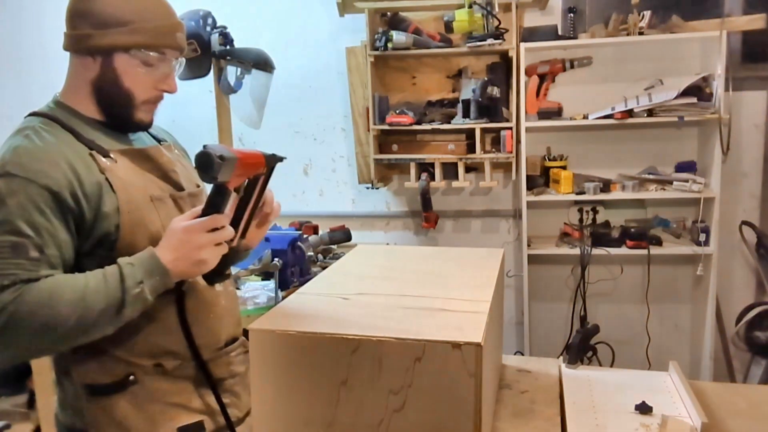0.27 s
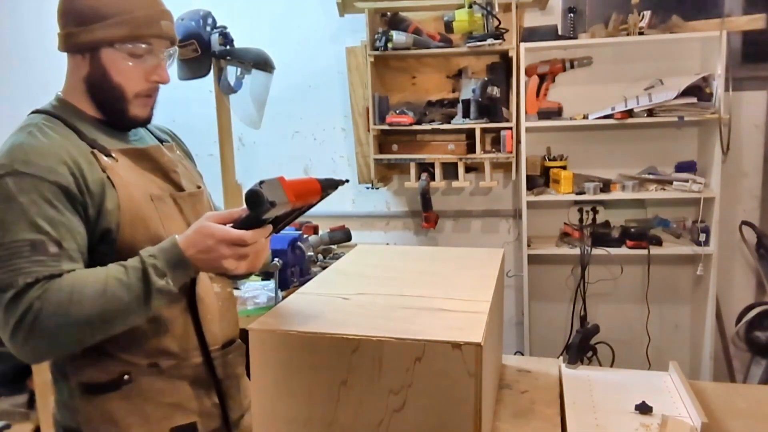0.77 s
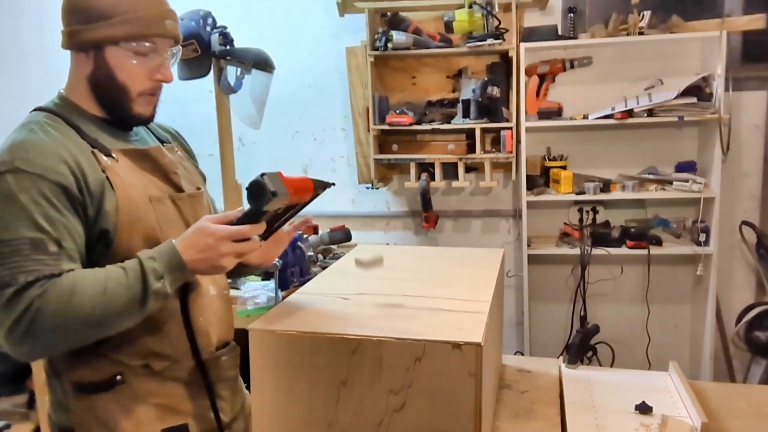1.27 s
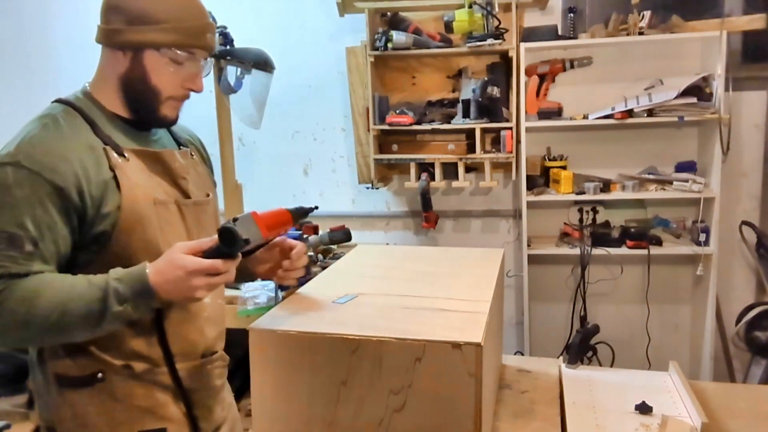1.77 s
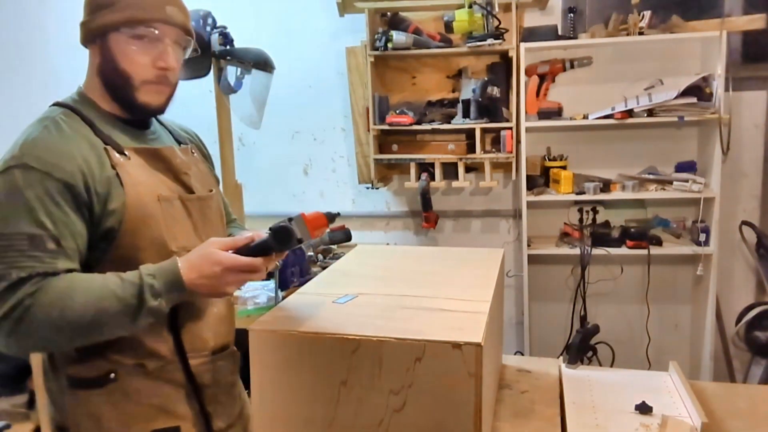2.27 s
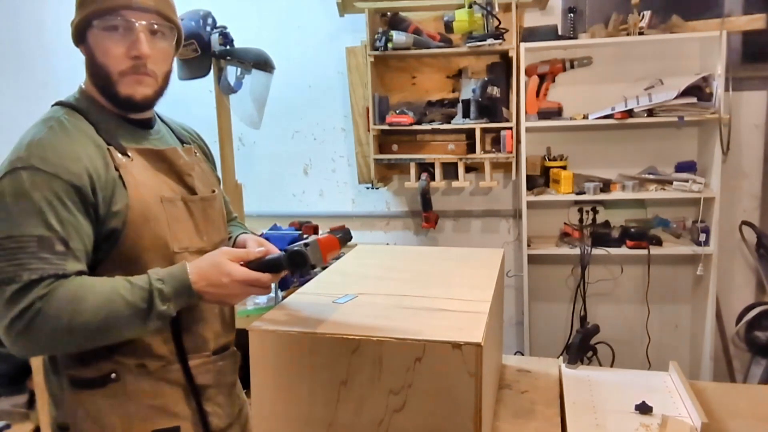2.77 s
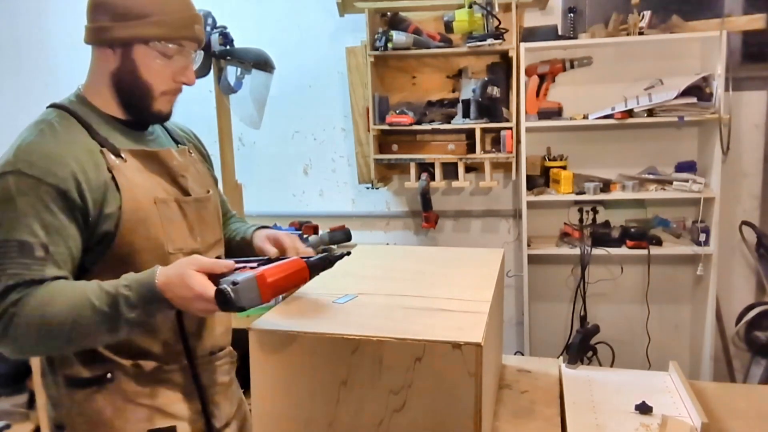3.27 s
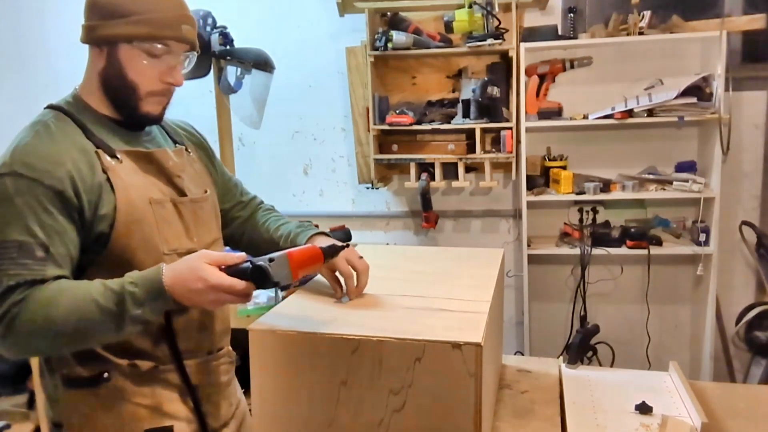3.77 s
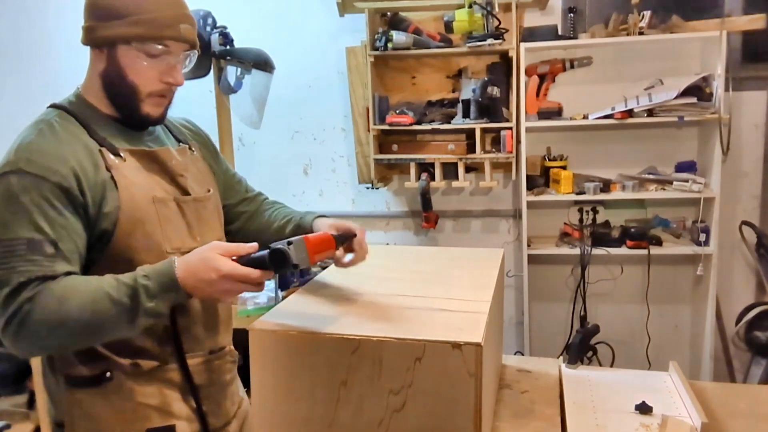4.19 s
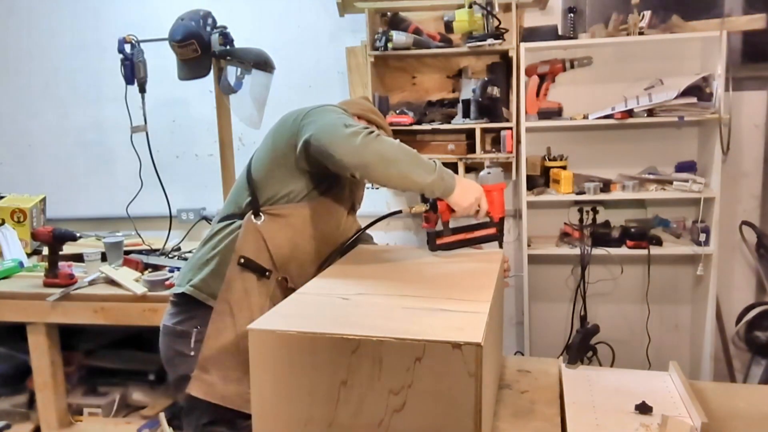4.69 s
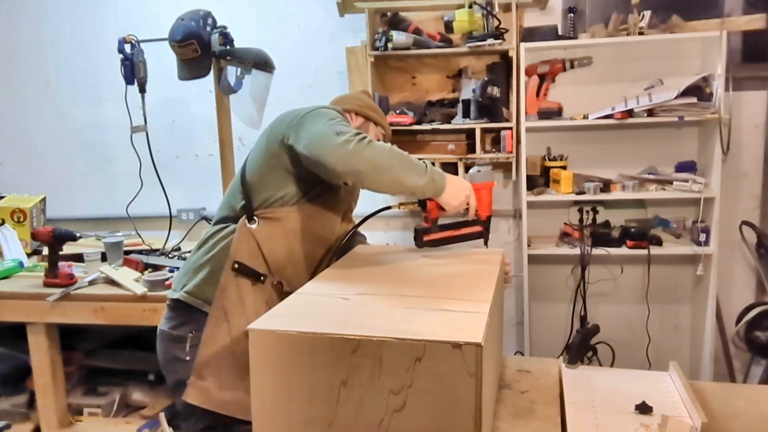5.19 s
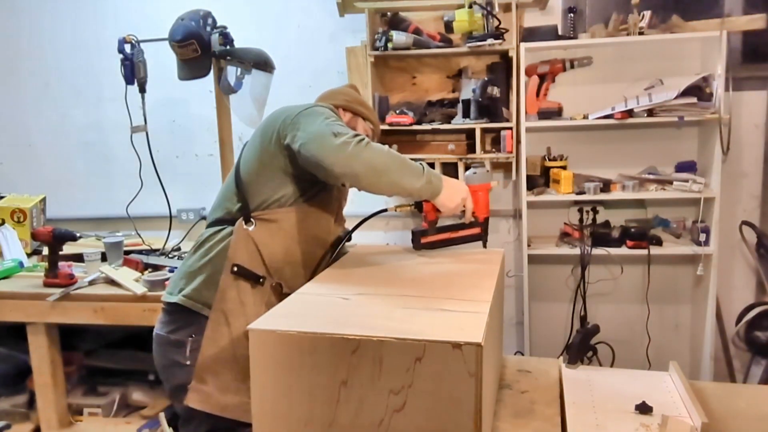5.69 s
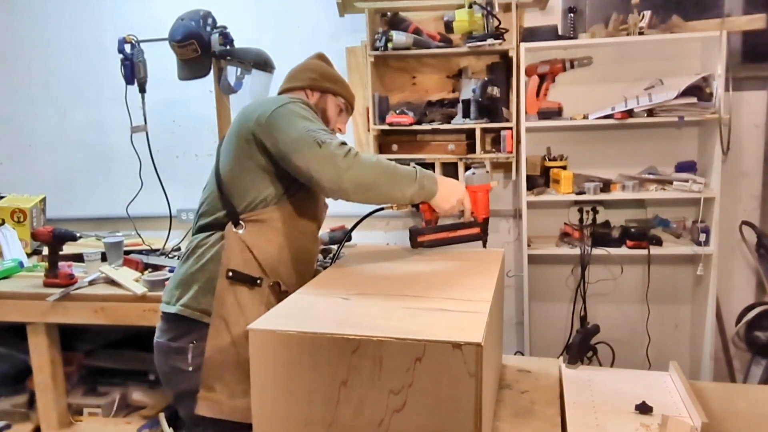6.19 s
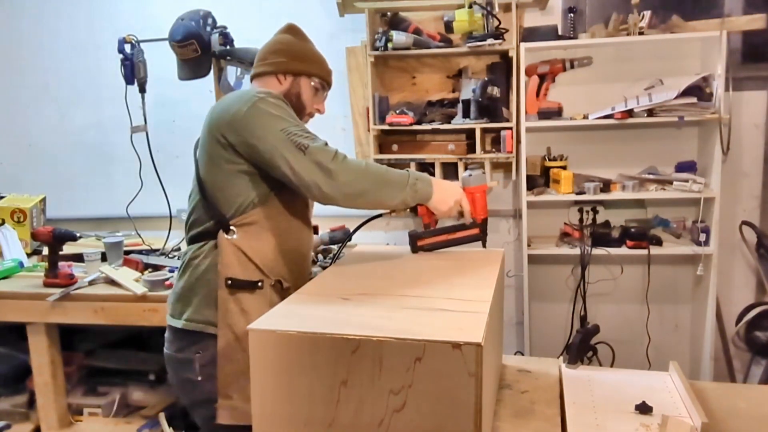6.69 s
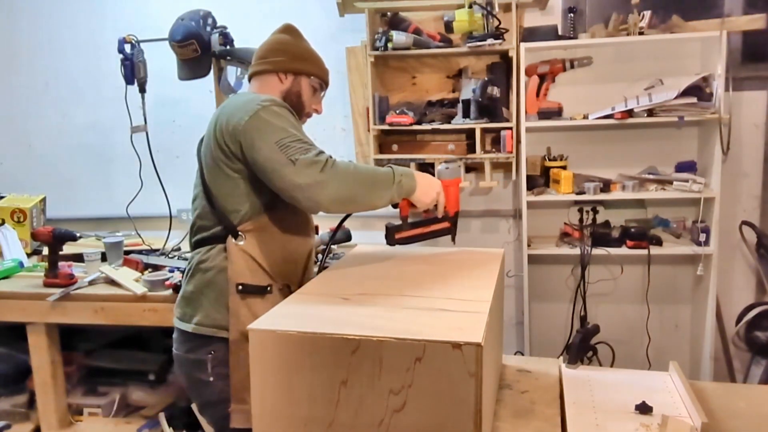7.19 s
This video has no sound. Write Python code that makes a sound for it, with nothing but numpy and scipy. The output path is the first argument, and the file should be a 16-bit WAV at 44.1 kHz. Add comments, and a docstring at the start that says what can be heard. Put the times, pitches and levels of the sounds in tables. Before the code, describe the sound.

A pneumatic nail gun is reloaded with metallic clatter, then fires two sharp shots into a wooden box, each with a hiss.

```python
"""A hard-walled garage: a pneumatic nailer is reloaded and fired twice into a plywood box.
The magazine clatters open, a strip of nails drops on the box, cloth rustles and the follower scrapes home.
Each shot is a valve puff, the driver's blow, a recoil thud through the box and a jet of exhaust air.
A limiter holds the blast and its echo at one level; a faint room rumble lies underneath."""
import sys
import numpy as np
from scipy import signal
from scipy.fft import rfft, irfft, next_fast_len
from scipy.io import wavfile
from scipy.ndimage import uniform_filter1d

SR = 44100
rng = np.random.default_rng(int(sys.argv[2]) if len(sys.argv) > 2 else 0)


def pcm_store(signal):
    """Save signal as 16-bit PCM."""
    levels = np.round(np.clip(np.atleast_2d(signal), -1, 1) * 32767)
    wavfile.write(sys.argv[1], SR, levels.astype(np.int16).T)


N = 328545
TIME = np.arange(N) / SR
RING_TIME = TIME[:2 ** 15]

# the two shots: (safety tip pressed [s], valve opens [s], driver strikes [s], exhaust starts [s],
# tip level [dB], valve level [dB], blow level [dB], exhaust level [dB])
SHOTS = [(4.451, 4.473, 4.497, 4.651, -44, -21.5, 1, -2), (6.46, 6.494, 6.517, 6.610, -55, -23, -4.5, -1.5)]
# bright spectrum of air jets and tinkling nails: (frequency [Hz], level [dB])
HISS = [(300, -29.5), (1000, -11.5), (2500, -10), (6500, -7.5), (8000, -10.5), (10000, -7), (12500, -2.5),
        (15500, -3)]


def from_db(db):
    """Decibels to amplitude."""
    return 10 ** (np.asarray(db) / 20)


def unit(x):
    """Scale to an energy of one."""
    return x / np.sqrt(np.sum(x ** 2, axis=-1, keepdims=True) + 1e-20)


def at_hz(points, hz):
    """Read a table on a log-frequency axis."""
    f, value = np.transpose(points)
    return np.interp(np.log(np.maximum(hz, 1)), np.log(f), value)


def colour(x, spectrum):
    """Minimum-phase EQ through (frequency [Hz], gain [dB]) points."""
    size = next_fast_len(x.shape[-1] // 2 + 2048, True) * 2
    gain = from_db(at_hz(spectrum, np.fft.rfftfreq(size, 1 / SR)))
    cepstrum = irfft(np.log(gain))
    cepstrum[1:size // 2] *= 2
    cepstrum[size // 2 + 1:] = 0
    return irfft(rfft(x, size) * np.exp(rfft(cepstrum)))[..., :x.shape[-1]]


def noise(spectrum):
    """Coloured noise of rms one."""
    return unit(colour(rng.standard_normal(N), spectrum)) * np.sqrt(N)


def grain(rough_db, per_s):
    """A gain that flutters at random."""
    knots = np.arange(0, 8, 1 / per_s)
    return from_db(rough_db * np.interp(TIME, knots, rng.standard_normal(len(knots))))


def diffuse(size):
    """Stereo noise from all sides: near mono in the bass, wide above it."""
    # (frequency [Hz], left-right correlation [-1..1])
    likeness = [(60, 0.97), (190, 0.96), (300, .87), (640, 0.24), (1400, -.05), (3100, .08), (7000, -0.02),
                (15000, 0.49)]
    mid, side = np.exp(2j * np.pi * rng.random((2, size // 2 + 1)))
    alike = at_hz(likeness, np.fft.rfftfreq(size, 1 / SR))
    return unit(irfft(np.sqrt(1 + alike) * mid + np.sqrt(1 - alike) * side * [[1], [-1]], size))


def add(out, s, sound, level_db):
    """Place a hit; its level is its energy spread over a twentieth of a second."""
    start = int(s * SR)
    out[start:start + len(sound)] += (from_db(level_db) * np.sqrt(SR / 20) * unit(sound))[:N - start]


def ringing(modes, detune=0.006):
    """Decaying sines; grip and contact point shift their pitch and strength a little each time."""
    hz, db, t60 = np.transpose(modes)[:, :, None]
    hz = hz * (1 + detune * rng.standard_normal(hz.shape))
    strength = from_db(db + rng.normal(0, 1.5, db.shape)) * rng.choice([-1, 1], db.shape)
    decay = np.exp(-np.log(1000) * RING_TIME / t60)
    return unit(np.sum(strength * decay * np.sin(2 * np.pi * hz * RING_TIME), axis=0))


def strike(spectrum, modes, ring_db, chatter_s):
    """A brief chatter of the parts, coloured by the body, plus its ringing modes."""
    chatter = rng.standard_normal(len(RING_TIME)) * np.exp(-RING_TIME / chatter_s)
    whitened = irfft(np.exp(1j * np.angle(rfft(chatter))))
    force = whitened * (RING_TIME < 10 * chatter_s)
    return unit(colour(force, spectrum)) + from_db(ring_db) * ringing(modes)


def room_rumble(level_db=-65):
    """Faint, steady room tone from all around."""
    # (frequency [Hz], level [dB])
    room_tone = [(18, -36), (30, -7), (75, 2.5), (410, -9.5), (575, -2.5), (1020, -14), (1230, -7.5),
                 (2550, -11), (5310, -19), (6370, -19), (8060, -24.5), (11900, -27), (15500, -31)]
    return from_db(level_db) * np.sqrt(N) * unit(colour(diffuse(N), room_tone))


def soft_rustles():
    """A brief, soft hiss fades at the very start; later, cloth rustles and low shuffles swell and fade."""
    # (middle [s], half length [s], rustle [dB], low shuffle [dB])
    cues = [(0.0, 0.041, -53.5, -61), (1.935, 0.17, -76, -64), (3.76, 0.18, -61, -63),
            (3.997, .045, -49, -68.5), (4.217, 0.036, -65, -61.5), (4.392, 0.073, -72.5, -61.5),
            (5.736, .14, -60, -50.5), (6.39, .05, -63.5, -60.5), (7.42, 0.15, -66, -59.5)]
    # papery mids and soft lows: (frequency [Hz], level [dB])
    rustle_spectrum = [(150, -11.5), (380, -8.5), (580, 3.5), (1000, -1), (2500, -4.5), (4500, -16.5),
                       (8000, -24.5), (15000, -28)]
    shuffle_spectrum = [(40, -17.5), (75, -1), (120, -9.5), (190, -0.5), (300, -12.5), (600, -16),
                        (2000, -48)]
    middle_s, half_s, rustle_db, shuffle_db = np.transpose(cues)
    swells = np.exp(-((TIME - middle_s[:, None]) / half_s[:, None]) ** 2)
    rustle = from_db(rustle_db) @ swells * noise(rustle_spectrum)
    shuffle = from_db(shuffle_db) @ swells * noise(shuffle_spectrum)
    return (rustle + shuffle) * grain(rough_db=1.5, per_s=120)


def gun_contact(hollow_db, body_db, edge_db, attack_s=0.0018):
    """One clack with a slightly softened attack: blunt ones sound hollow, steel on steel has an edge."""
    # the gun's body: (frequency [Hz], level [dB])
    spectrum = [(100, -43.5), (250, -24), (500, -7.5), (900, -3), (1900, 3), (3200, -0.5), (4000, -1),
                (6000, -3.5), (8000, -12), (10000, -11), (15500, -12)]
    # its ring: (frequency [Hz], level [dB], t60 [s])
    modes = [(917, 5, 0.039), (1217, -6.5, .16), (1443, -3.5, 0.11), (1847, 4, 0.1), (2534, 2, 0.081),
             (3250, -0.5, 0.038), (4100, -5, 0.075), (4880, -5, 0.046), (5270, -6.5, 0.02),
             (6020, 0.5, 0.074), (7360, -10.5, .1), (10060, -9, 0.05), (11530, -9.5, .07)]
    hit = strike(spectrum, modes, ring_db=-10, chatter_s=0.0055)
    fade_in = 1 - np.exp(-RING_TIME / attack_s)
    tone = [(110, -26), (350, hollow_db - 0.5), (900, hollow_db),   # small parts radiate no bass
            (1500, body_db), (2500, 0), (9000, edge_db)]
    return colour(hit * fade_in, tone)


def gun_taps():
    """Hand and hose bump the gun with blunt, hollow taps."""
    # (time [s], level [dB], edge [dB])
    taps = [(0.227, -51.5, -7.5), (2.184, -55, -27), (2.220, -50, -19.5), (2.236, -52, -15),
            (2.376, -51.5, -15), (2.562, -41.5, -13), (2.723, -50, -16), (5.780, -52.5, -18),
            (7.284, -52.5, -17), (7.303, -47, -8)]
    out = np.zeros(N)
    for s, db, edge_db in taps:
        add(out, s, gun_contact(hollow_db=8.5, body_db=4, edge_db=edge_db), db)
    return out


def steel_snaps():
    """Steel parts snap against a stop and the magazine rail rings."""
    # (time [s], level [dB], edge [dB], rail ring [dB])
    snaps = [(0.251, -32.5, 7.5, -35.5), (.282, -39.5, 0, -46), (.446, -49.5, 1, -53),
             (2.254, -43, -3, -56), (2.901, -42, -2, -56.5), (2.973, -18, 5, -39), (5.185, -53, -4, -68),
             (5.323, -52.5, -1.5, -66), (5.384, -57.5, 6, -70)]
    # (frequency [Hz], level [dB], t60 [s])
    rail_modes = [(1150, -10.5, 0.1), (1280, -7.5, .3), (1400, -6, 0.2), (1462, -7, 0.32),
                  (2580, -3.5, .16), (2700, -2, 0.11), (3300, -6, .2), (4140, -5.5, 0.16), (4380, -4, 0.32),
                  (4830, -8, .16), (5870, -1.5, .14), (6230, -1.5, .14), (7160, -12, .25),
                  (10200, -12.5, .2)]
    out = np.zeros(N)
    for s, db, edge_db, rail_db in snaps:
        thin_db = 0.9 * edge_db   # the sharper the edge, the thinner the mids
        add(out, s, gun_contact(hollow_db=-3 - thin_db, body_db=-5 - thin_db, edge_db=edge_db), db)
        rail = ringing(rail_modes, detune=0.0035)
        add(out, s, colour(rail, [(300, -30.5), (1100, 1.5)]), rail_db)
    return out


def follower_slides(width_hz=260, loosen_s=0.036, push_s=0.1, swell_db=20.5):
    """The follower scrapes along the magazine; two resonances climb as the free channel shortens."""
    # (start [s], end [s], level [dB], first resonance at start [Hz], at end [Hz])
    slides = [(0.777, .888, -40, 1397, 1900), (2.72, 2.973, -39.5, 720, 2854)]
    # gritty friction: (frequency [Hz], level [dB])
    friction = [(300, -30), (470, -19.5), (580, 0), (750, -12), (1400, -2), (2700, 3), (6000, -5.5),
                (8000, -17.5), (15500, -17)]
    scrape, out = noise(friction), np.zeros(N)
    band = [(width_hz / 2, 0), (width_hz * 10, -60)]
    lower, upper = [noise(band) * np.sqrt(2) for _ in range(2)]
    for start_s, end_s, db, start_hz, end_hz in slides:
        hz = np.exp(np.interp(TIME, [start_s, end_s], np.log([start_hz, end_hz])))
        phase = 2 * np.pi * np.cumsum(hz) / SR
        channel = lower * np.sin(phase) + from_db(-4) * upper * np.sin(1.57 * phase)
        push_db = np.interp(TIME - start_s, [0, push_s], [-swell_db, 0])   # it gathers speed
        moving = np.clip((TIME - start_s) / loosen_s, 0, 1) * (TIME < end_s)
        howl = 0.7 * from_db(0.7 * push_db) * channel   # swells less than the grit
        out += from_db(db) * moving * (from_db(push_db) * scrape + howl)
    return out * grain(rough_db=1.5, per_s=250)


def magazine_clatter(opening_db_per_s=70, rebound_s=0.006, rebound_loss_db=4):
    """The magazine clatters open, ever hollower as the air in its channel rings more."""
    # (time [s], level [dB])
    contacts = [(0.884, -32), (0.892, -18.5), (.924, -21.5), (.944, -18), (.970, -17.5), (1.001, -19.5)]
    out = np.zeros(N)
    for s, db in contacts:
        open_db = opening_db_per_s * (s - contacts[0][0])
        channel = ringing([(910, 0, 0.04)], detune=0.06)
        add(out, s, colour(channel, [(100, -45), (800, 0)]), db - 17 + open_db)
        for k in range(2):   # each contact rebounds once
            hit = gun_contact(hollow_db=open_db - 5, body_db=open_db - 2.5, edge_db=1.5)
            add(out, s + k * rebound_s, hit, db - k * rebound_loss_db)
    return out


def box_contact(boom_db, knock_db, ring_db):
    """Heavy, soft contacts make the box boom; light, hard ones knock."""
    # the plywood's body: (frequency [Hz], level [dB])
    spectrum = [(35, -45), (65, -10.5), (110, -12.5), (180, 4.5), (280, -1.5), (420, -2.5), (650, -1),
                (1100, -4.5), (2700, -9), (4000, -24), (6500, -29.5), (15000, -62.5)]
    # its ring: (frequency [Hz], level [dB], t60 [s])
    modes = [(145.4, -0.5, 0.097), (165, 2.5, .1), (207, 2.5, 0.11), (290.5, -5.5, .15), (416, -3.5, .15),
             (570, 0.5, 0.31), (724, -3, 0.2), (1390, -11, 0.093), (2514, -8, .15)]
    hit = strike(spectrum, modes, ring_db, chatter_s=0.01)
    tone = [(28, -20.5), (62, boom_db), (80, boom_db), (140, 1.5), (200, -1), (450, knock_db)]
    return colour(hit, tone)


def box_knocks(colour_share=0.38, rock_shrink=0.58):
    """The box is knocked and rocks twice, with dull thuds that keep some of the blow's colour."""
    # (time [s], level [dB], boom [dB], knock [dB], first rock after [s], rock relative to blow [dB])
    knocks = [(1.249, -13, -26, 3.5, 0.081, -5.5), (3.497, -51, -7, -17.5, 0.029, -9.5),
              (5.326, -33, 11, -16, .047, -7), (6.019, -55.5, -1, -13.5, .04, -11.5),
              (7.305, -50, 7, -10, .05, -11)]
    out = np.zeros(N)
    for s, db, boom_db, knock_db, rock_s, rock_db in knocks:
        add(out, s, box_contact(boom_db, knock_db, ring_db=-3.5), db)
        for k in range(2):   # the second rock comes sooner and 1 dB weaker
            s += rock_s * rock_shrink ** k
            thud = box_contact(13 + colour_share * boom_db, -11.5 + colour_share * knock_db, ring_db=-6)
            add(out, s, thud, db + rock_db - k)
    return out


def nail_strip():
    """The strip of nails tinkles as it lands and bounces."""
    # (time [s], level [dB])
    bounces = [(1.249, -40), (1.256, -46.5), (1.38, -42.5), (1.434, -51)]
    # the strip's ring: (frequency [Hz], level [dB], t60 [s])
    modes = [(7461, 0, .07), (7560, -2, .05), (8533, -9, .06), (10200, -19, .05)]
    out = np.zeros(N)
    for s, db in bounces:
        add(out, s, strike(HISS, modes, ring_db=8, chatter_s=0.0034), db)
    return out


def safety_tip():
    """A bright click as the tip is pressed on before each shot."""
    out = np.zeros(N)
    for s, _, _, _, db, _, _, _ in SHOTS:
        add(out, s, gun_contact(hollow_db=-3.5, body_db=4, edge_db=8), db)
    return out


def shot_thuds():
    """The box thuds as the tip presses on, the gun recoils and lands, and the piston returns."""
    # each thud: (delay [s], level [dB], boom [dB], knock [dB])
    press = (.013, -47.5, 3.5, -10)
    recoil = (.012, -12, -5.5, -12.5)
    landing = (.046, -16, 5, 0.5)
    piston_return = (.034, -19, 14, -13)
    out = np.zeros(N)
    for tip_s, _, blow_s, exhaust_s, _, _, blow_db, _ in SHOTS:
        cues = [(tip_s, press), (blow_s, recoil), (blow_s, landing), (exhaust_s, piston_return)]
        for s, (delay_s, db, boom_db, knock_db) in cues:
            thud = box_contact(boom_db, knock_db, ring_db=-4.5)
            add(out, s + delay_s, thud, db + 0.31 * blow_db)   # a harder blow thuds louder
    return out


def jet(start_s, rise_s, fall_s):
    """Air flow through a valve that opens and drains a chamber."""
    age = np.maximum(TIME - start_s, 0)
    return (1 - np.exp(-age / rise_s)) * np.exp(-(age / fall_s) ** 2)


def air_jets():
    """The trigger valve puffs before the blow; on release the cylinder vents, then a faint hiss lingers."""
    flow = np.zeros(N)
    for _, valve_s, _, exhaust_s, _, valve_db, _, exhaust_db in SHOTS:
        flow += from_db(valve_db) * jet(valve_s, rise_s=0.0015, fall_s=0.095)
        flow += from_db(exhaust_db) * jet(exhaust_s, rise_s=0.0015, fall_s=0.022)
        flow += from_db(-61.5) * jet(exhaust_s, rise_s=0.05, fall_s=0.42)
    return flow * noise(HISS)


def driver_blows():
    """The piston slams the nail home; gun and plywood ring together."""
    # the slam: (frequency [Hz], level [dB])
    spectrum = [(35, -40), (70, -11.5), (190, -7.5), (380, -6.5), (560, -7), (780, -1.5), (1150, -5),
                (1800, 3), (2700, 0), (3700, -4), (6200, -9), (8000, -17.5), (15500, -12)]
    # its ring: (frequency [Hz], level [dB], t60 [s])
    modes = [(171, -3, .12), (196.8, -1, 0.05), (526, -4, 0.092), (558, -5, 0.18), (726, -5.5, .06),
             (794, -7, .08), (1405, -10.5, .06), (1636, 1, .06), (1878, 2, .06), (1965, -3.5, .05),
             (2210, -1, 0.052), (2484, 0, 0.037), (2704, 3, 0.041), (2955, 0, 0.029), (3300, -0.5, .035),
             (4270, -2, 0.03), (6300, -8.5, .04)]
    out = np.zeros(N)
    for _, _, s, _, _, _, db, _ in SHOTS:
        blow = strike(spectrum, modes, ring_db=-3, chatter_s=0.023)
        crack = colour(blow, [(500, -13), (1600, 0)])
        panel = 1 - np.exp(-RING_TIME / 0.007)   # the steel cracks first, the heavy panel follows
        add(out, s, panel * blow + (1 - panel) * crack, db)
    return out


def garage_echo(build_s=0.0014):
    """Dense reflections that build up quickly and die away band by band."""
    # (frequency [Hz], t60 [s])
    decay_times = [(60, 0.53), (170, 0.46), (420, 0.64), (1100, 0.76), (2900, 0.67), (5000, 0.63),
                   (7700, 0.45), (15000, 0.27)]
    size = len(RING_TIME)
    field, hz = rfft(diffuse(size)), np.fft.rfftfreq(size, 1 / SR)
    centres, t60s = np.transpose(decay_times)
    echo = 0
    for share, t60 in zip(np.eye(len(centres)), t60s):
        band = irfft(field * at_hz(np.c_[centres, share], hz))
        echo += band * np.exp(-np.log(1000) * RING_TIME / t60) / np.sqrt(t60)
    echo *= grain(rough_db=2, per_s=300)[:size]   # reflections arrive in clumps
    return unit(echo * (1 - np.exp(-(RING_TIME / build_s) ** 2)))


def in_garage(x, direct_db, left_db, lag_s):
    """Direct sound plus echo; the left side is louder by left_db, its direct sound later by lag_s."""
    direct = np.array([np.interp(TIME - lag_s, TIME, x, left=0), x])
    echo = signal.oaconvolve(x[None], garage_echo(), axes=1)[:, :N]
    return (from_db(direct_db) * direct + echo) * from_db([[left_db / 2], [-left_db / 2]])


def scene():
    """Handling near the middle, shots to the right, over a faint room rumble."""
    clacks = gun_taps() + steel_snaps() + magazine_clatter() + safety_tip()
    handling = in_garage(soft_rustles() + clacks + follower_slides(), direct_db=-5.5, left_db=1, lag_s=0)
    box = in_garage(box_knocks() + nail_strip() + shot_thuds(), direct_db=-3.5, left_db=-0.1, lag_s=7e-5)
    shots = in_garage(air_jets() + driver_blows(), direct_db=-1, left_db=0.4, lag_s=1.36e-4)
    return room_rumble() + handling + box + shots


def limit(x, ceiling_db, release_db_per_s, window_s=0.0073, ahead_s=0.0024):
    """The gain dips just before the short-term level passes the ceiling, then recovers quickly."""
    power = uniform_filter1d(np.mean(x ** 2, axis=0), int(window_s * SR))
    over_db = np.maximum(10 * np.log10(np.maximum(power, 1e-12)) - ceiling_db, 0)
    ramp = release_db_per_s * TIME
    cut_db = np.maximum.accumulate(over_db + ramp) - ramp
    cut_db = np.maximum(cut_db, np.interp(TIME + ahead_s, TIME, cut_db))
    return x * from_db(-uniform_filter1d(cut_db, size=96))


def record(dry):
    """Limiter, rounded peaks and a steep top cut."""
    held = limit(dry, ceiling_db=-10.5, release_db_per_s=199.5)
    rounded = 1.059 * np.tanh(held / 1.174)
    top_cut = signal.ellip(12, 0.1, 100, 15900, fs=SR, output="sos")
    return signal.sosfilt(top_cut, rounded)


dry = scene()
out = record(dry)
pcm_store(out)
```